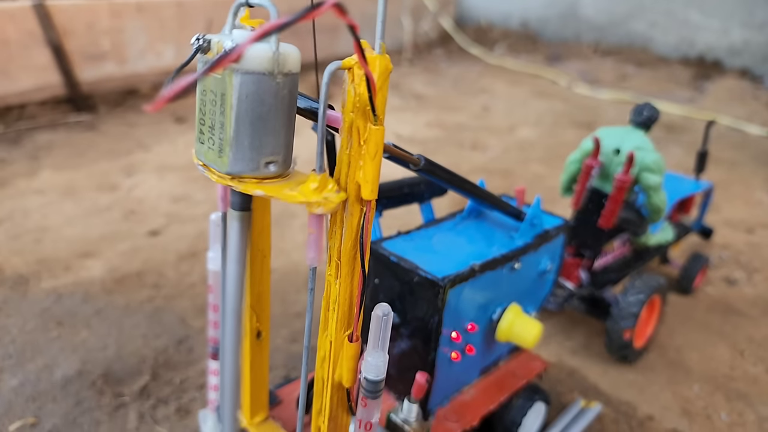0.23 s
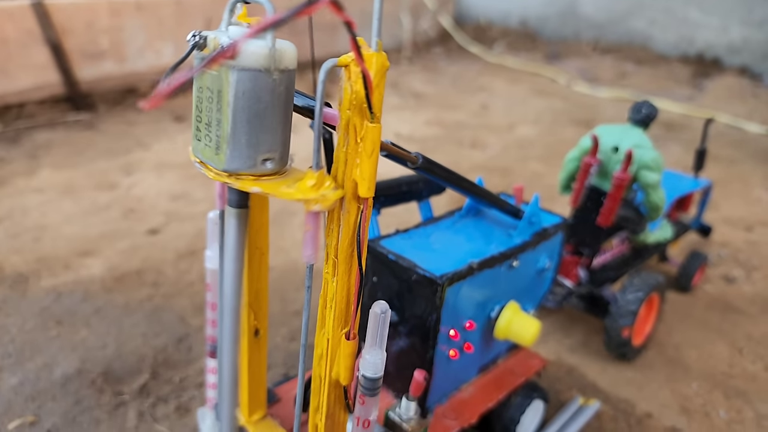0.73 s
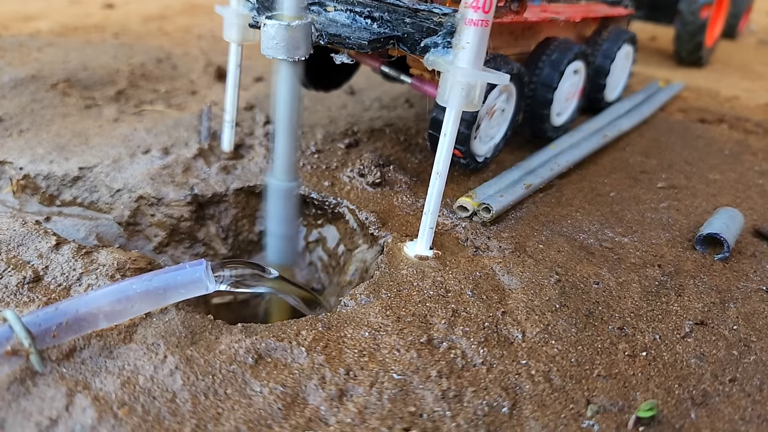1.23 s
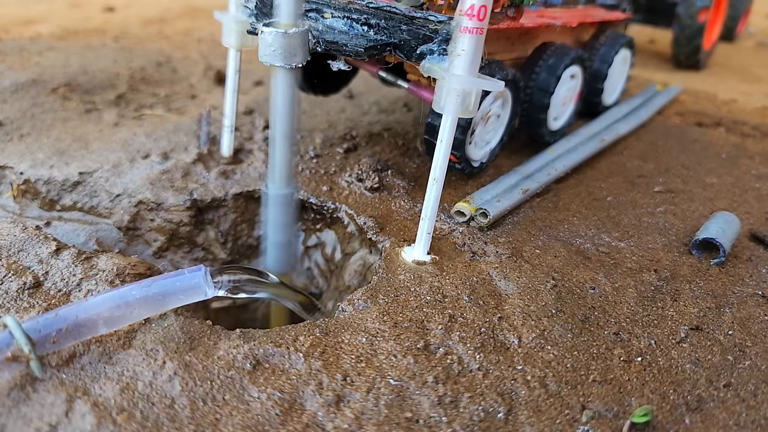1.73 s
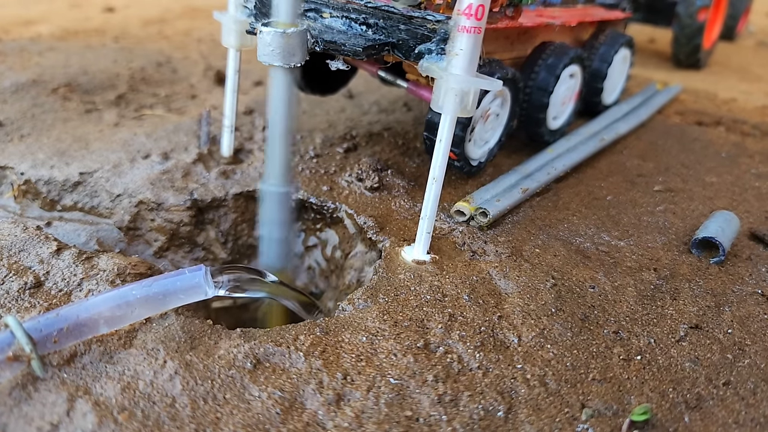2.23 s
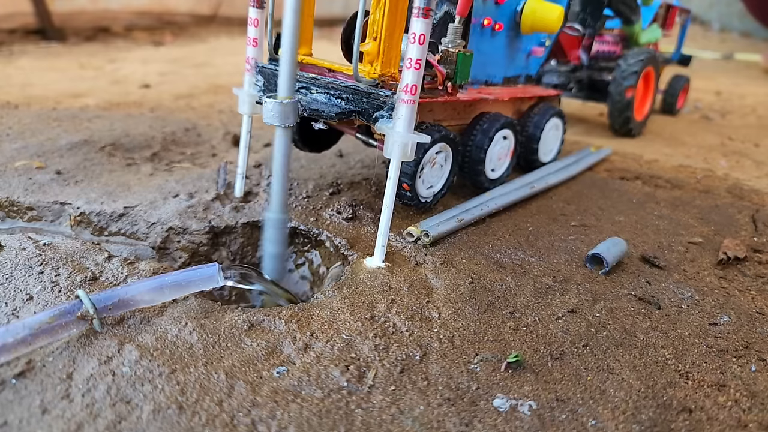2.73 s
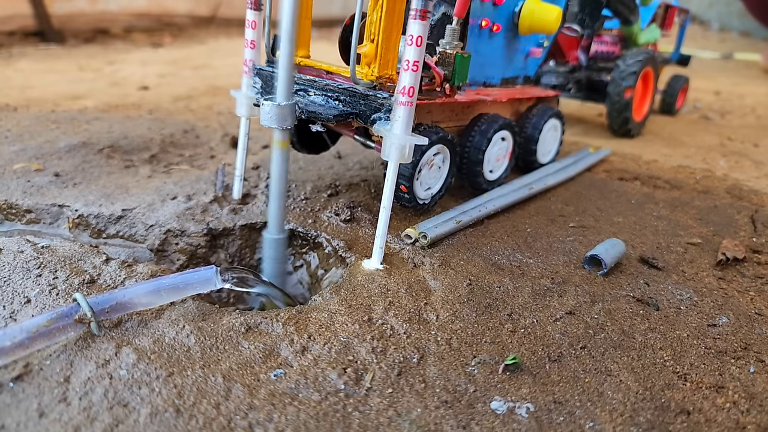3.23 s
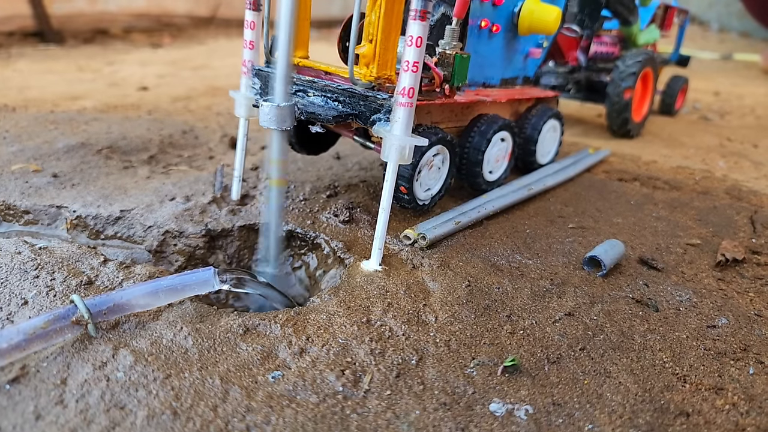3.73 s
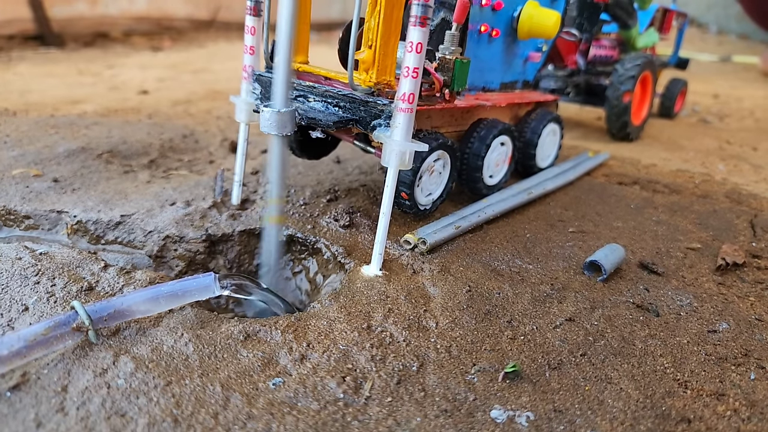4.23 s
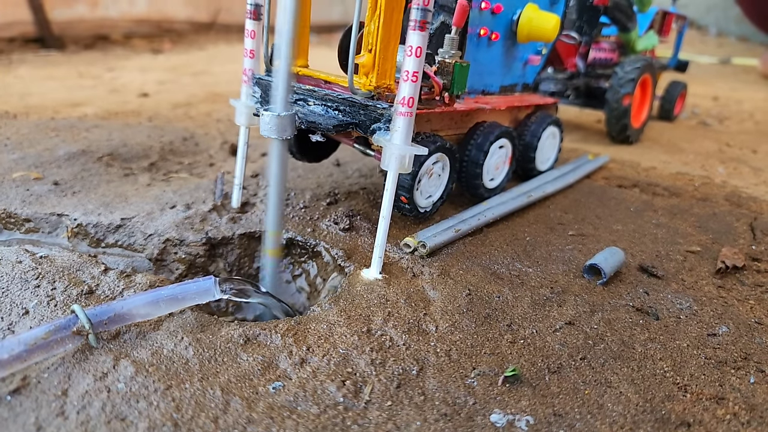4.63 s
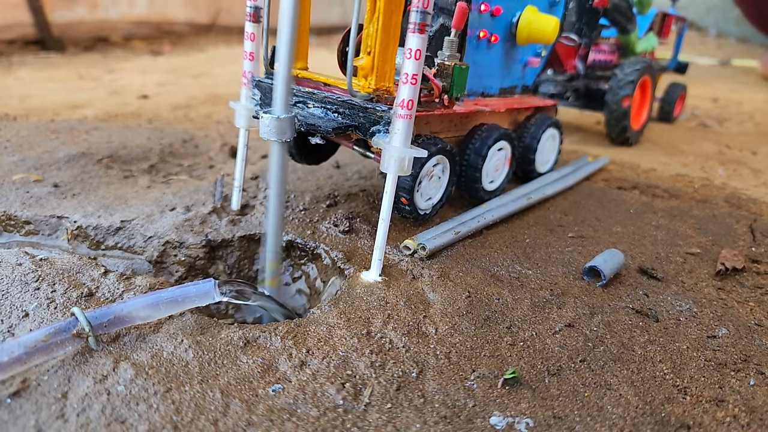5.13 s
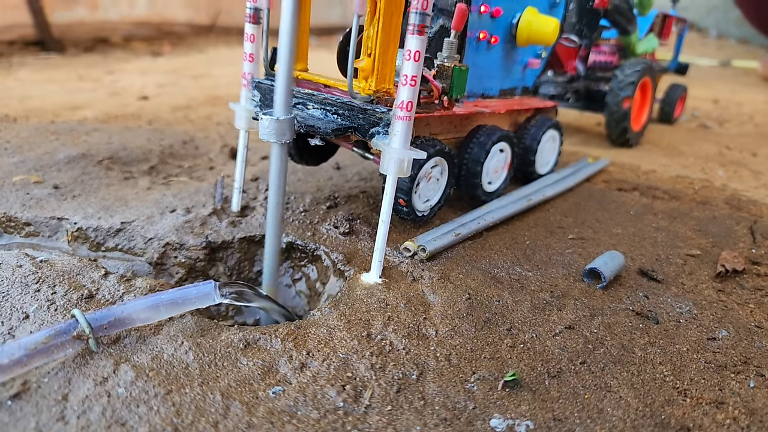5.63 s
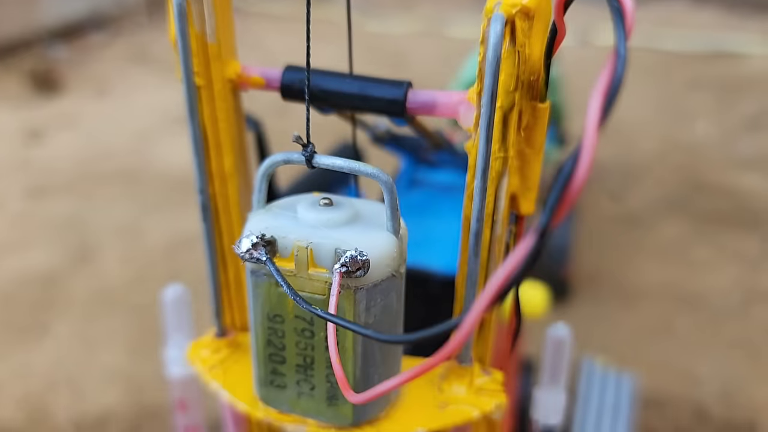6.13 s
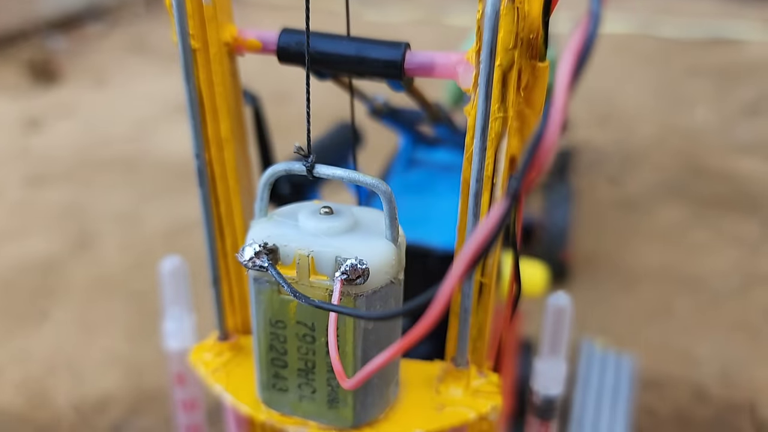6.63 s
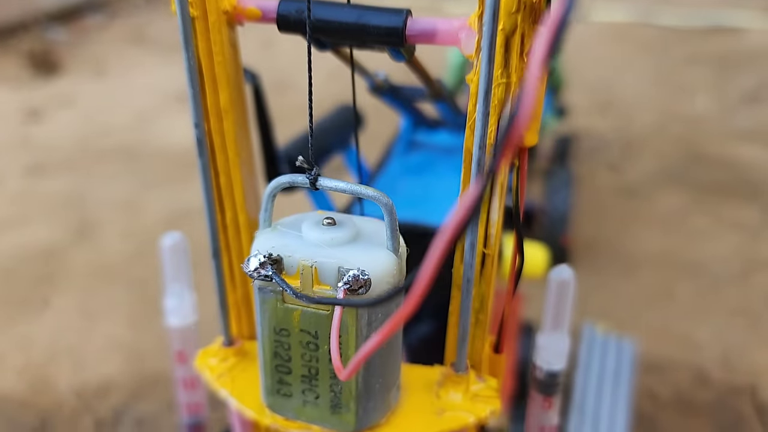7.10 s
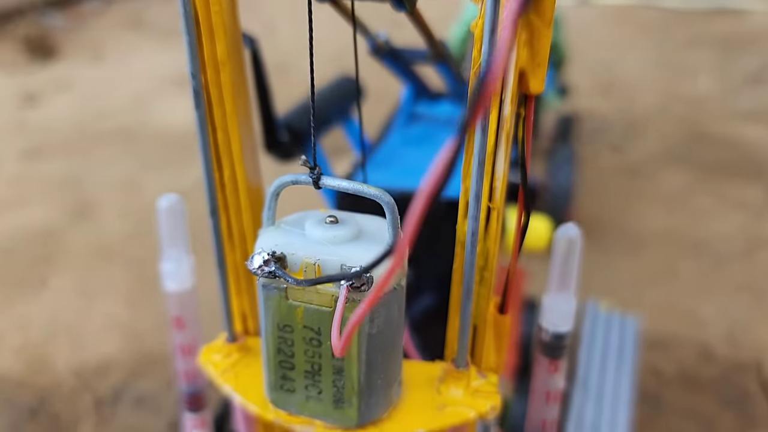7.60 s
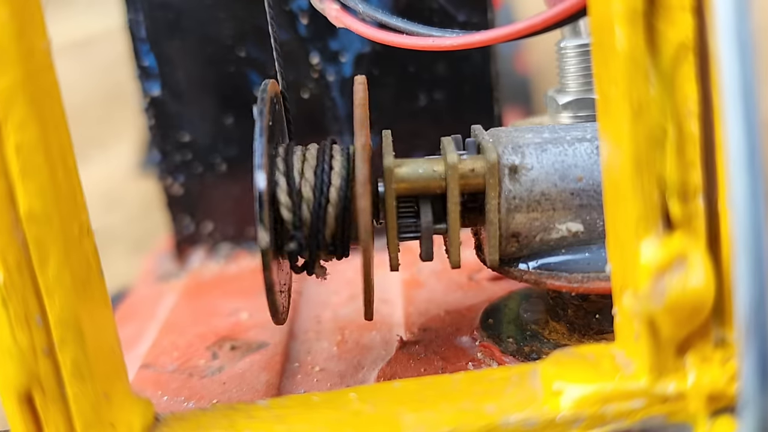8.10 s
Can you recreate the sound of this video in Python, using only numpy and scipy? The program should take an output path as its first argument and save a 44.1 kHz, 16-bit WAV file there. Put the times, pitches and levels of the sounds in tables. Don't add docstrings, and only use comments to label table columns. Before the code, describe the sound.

From 0 to about 5.8 seconds a small toy drill motor runs quietly and steadily, slightly left in a narrow, dry, close outdoor stereo image. It is a low buzzing hum with a soft throbbing rub, overlaid by very fast, dry rattling of loose parts and thin, bright brush ticks; harder little clicks jump out irregularly. At about 5.8 a geared winch motor switches on, close, centred and far louder. A clank and short metallic ring come first, then a rough, rising whirr with knocks around 5.9, a sharp crack as the string snaps tight, and another knock near 6.1, while the frame shudders low. Pulsing bites fade by about 6.4 as the speed settles. From there to 8.4 a steady, midrange nasal gear whine with bright overtones and gritty grinding wavers slightly, growing stronger after 7, with the drill rattle continuing underneath.

```python
import sys
import numpy as np
from scipy import signal
from scipy.fft import rfft, irfft, next_fast_len
from scipy.io import wavfile
from scipy.ndimage import uniform_filter1d

SR = 44100
rng = np.random.default_rng(int(sys.argv[2]) if len(sys.argv) > 2 else 0)


def wrap_up_sound(samples):
    columns = np.atleast_2d(samples).T
    tamed = np.clip(columns, -1, 1)
    steps = np.round(tamed * 32767).astype(np.int16)
    wavfile.write(sys.argv[1], SR, steps)


def decibels_to_gain(level_db):
    exponent = np.asarray(level_db, float) / 20
    return 10 ** exponent


N = 368676
TIME = np.arange(N) / SR


def evened(x):
    return x / np.sqrt(np.mean(x ** 2) + 1e-20)


def at_time(points):
    return np.interp(TIME, *np.transpose(points))


def read(points, size):
    hz, value = np.transpose(points)
    return np.interp(np.log(np.fft.rfftfreq(size, 1 / SR) + 1), np.log(hz + 1), value)


def colour(x, spectrum, size=8192):
    log_gain = np.log(decibels_to_gain(np.maximum(read(spectrum, size), -100)))
    whole = np.r_[log_gain, log_gain[-2:0:-1]]
    taps = np.fft.ifft(np.exp(np.conj(signal.hilbert(whole)))).real[:size // 2]
    taps = taps.reshape((1,) * (x.ndim - 1) + (-1,))
    return signal.oaconvolve(x, taps, axes=-1)[..., :N]


def wander(hz):
    at_s = np.arange(0, N + 64, 64) / SR
    b, a = signal.butter(2, hz * 128 / SR)
    noise = signal.lfilter(b, a, rng.standard_normal(len(at_s) + 2000))[2000:]
    return np.interp(TIME, at_s, evened(noise))


def strikes(at_s, size, decay_ms):
    at = np.clip((at_s * SR).astype(int), 0, N - 1)
    train = np.bincount(at, size * (at_s < N / SR), N)
    u = np.arange(1500) / SR / (decay_ms / 1000)
    return signal.oaconvolve(train, (1 - np.exp(-6 * u)) * np.exp(-u))[:N]


def grit(grain_db):
    grain = np.minimum(rng.exponential(1, N), 4)
    return decibels_to_gain(grain_db * grain) * rng.standard_normal((2, N))


SWITCH_S = 5.82
# missing_hz, time_constant_s
SPIN_UP = [
    (135, .05),
    (30, .13),
]
# start_s, mesh_hz
MESH_SPEED = [(5.8, 563.5), (6.45, 564.8), (6.8, 564.8), (6.95, 563.8), (7.3, 562.4), (7.5, 565.0),
              (7.8, 564.5), (8.0, 566.5), (8.36, 566.2)]
TEETH = 11
# start_s, level_db
LOAD = [(5.82, -34.5), (5.86, -26), (5.92, -21.5), (6.17, -17.5), (6.45, -19), (6.8, -21), (7.2, -15),
        (7.7, -13.5), (8.36, -14.5)]
# centre_s, extra_db
BITES = [(5.84, 7), (5.935, 8.5), (6.022, 10), (6.095, 6.5), (6.21, 3.5), (6.25, 1), (6.31, 5.5),
         (6.39, 4.5)]
# pinion_multiple, level_db, drift_db_per_s, swing_db, period_s, loudest_s
SWELLS = [(21, -41.5, -3, 1.5, 1.4, 6.9), (22, -33.5, -3.6, 2.5, 1.4, 6.9), (27, -43, 0, 5, 1.15, 6.55),
          (33, -38, -1.5, 4, .98, 6.85), (44, -40.5, .5, 5.5, 1.27, 7.66), (99, -44, 1.2, 3, .65, 7.62),
          (121, -39.5, -4.2, 2.5, 2.8, 7.2), (132, -46.5, 2, 2.5, 1.8, 7.7)]
# mesh_multiple, rms_db
MESH = [(5, -44.5), (6, -46), (7, -52), (8, -48), (10, -47.5), (13, -50.5), (14, -50), (15, -53.5),
        (16, -63), (17, -58), (18, -63), (19, -61), (20, -58)]
# pinion_multiple, rms_db
SHAFT = [(10, -42), (12, -44), (13, -49), (23, -50), (24, -52), (26, -52), (29, -51), (54, -50)]


def mesh_whine(since_s):
    short_hz = sum(hz * np.exp(-since_s / constant_s) for hz, constant_s in SPIN_UP)
    unsteady = .0022 + .017 * np.exp(-abs(TIME - 5.85) / .08)
    mesh_hz = (at_time(MESH_SPEED) - short_hz) * (1.001 + unsteady * wander(35))
    teeth = np.cumsum(mesh_hz) / SR
    wheel = np.cos(2 * np.pi * (teeth - teeth[int(6.86 * SR)]) / 58)
    bite_db = sum(db * np.exp(-((TIME - s) / .019) ** 2) for s, db in BITES)
    lines = [(1, at_time(LOAD) + bite_db + 0.14 * wander(33))]
    for order, db, drift_db, swing_db, period_s, loudest_s in SWELLS:
        k = round(order) / TEETH
        swing = swing_db * np.cos(2 * np.pi * (TIME - loudest_s) / period_s)
        swell_db = db + swing + drift_db * (TIME - 7.05)
        run_in_db = np.minimum(.022 * (k + 3) * short_hz, 18)
        line_db = swell_db - run_in_db + 7 / k * wheel + .4 * bite_db + 1.9 * wander(18)
        lines.append((k, line_db))
    lines += [(k, db + (2 + k / 10) * wander(k)) for k, db in MESH]
    lines += [(order / TEETH, db + 2.6 * wander(5)) for order, db in SHAFT]
    on = int(5.79 * SR)
    whine = np.zeros(N)
    for k, db in lines:
        whine[on:] += decibels_to_gain(db[on:]) * np.sin(2 * np.pi * (k * teeth[on:] + rng.random()))
    return np.sqrt(2) * whine


# freq_hz, density_db_per_hz
GEARBOX = [(300, -12), (480, -2), (570, 12.5), (640, -5.5), (760, -9.5), (900, -9.5), (1100, -6.5),
           (1700, -7.5), (2100, -6.5), (2700, -2.5), (3400, -7), (4300, -11.5), (5500, -13.5),
           (7200, -17.5), (8500, -21), (10500, -30), (12500, -32.5)]
# freq_hz, density_db_per_hz
MAST = [(30, -36), (60, -30), (92, 6), (115, 5), (150, 5), (250, 4), (400, 14), (520, -51.5)]


def gear_noise(since_s):
    grind_db = -29.5 + 0.5 * np.exp(-since_s / .2) - 0.83 * since_s
    jolt_s = TIME - 5.93
    shake_db = -35 + 20 * np.exp(np.where(jolt_s < 0, jolt_s / 0.14, -jolt_s / .17))
    a, b = grit(1.0)
    grind = decibels_to_gain(grind_db + 2) * evened(colour(a * decibels_to_gain(0.7 * wander(40)), GEARBOX))
    shake = decibels_to_gain(shake_db - 8.5) * evened(colour(b * decibels_to_gain(1.6 * wander(6.6)), MAST))
    return grind + shake


def winch():
    since_s = np.maximum(TIME - SWITCH_S, 0)
    switched = np.clip((TIME - 5.795) / 0.0059, 0, 1)
    return (mesh_whine(since_s) + gear_noise(since_s)) * switched


# start_s, peak_db, decay_ms
BLOWS = [(5.8, -16, 7), (5.811, -14, 5.7), (5.898, -8.5, 13), (5.909, -13, 6.2), (5.924, -13, 18),
         (5.937, -6, 10.3), (5.947, -13, 16), (5.963, -11.5, 13), (5.981, -15, 23), (6.087, -7.5, 14),
         (6.1, -17, 14), (6.133, -14.5, 16), (6.279, -16, 7)]
# freq_hz, density_db_per_hz
CLANK = [(60, -82), (300, -28), (900, 2), (1300, 2.5), (1700, -1.5), (2800, -0.5), (4000, -7), (6000, -23),
         (9000, -45), (12000, -49)]
# start_s, pitch_hz,
# peak_db, rise_ms, t60_s
RINGS = [(5.797, 618, -7.5, 3.8, 0.095), (5.815, 643, -13, 3.8, 0.14), (5.801, 350, -24, 4.6, .2),
         (5.821, 250, -28, 10, 0.33), (6.101, 180, -33, 8, 0.27), (6.1, 280, -29.5, 6, 0.24),
         (5.832, 403, -15.5, 5, 0.16), (5.899, 178, -17.5, 4.2, 0.27), (5.9, 620, -8.5, 9.3, 0.18),
         (5.902, 283, -22, 4.3, 0.35), (5.898, 89, -36.5, 17, 2.4), (5.933, 440, -16.5, 2.2, 0.13),
         (5.948, 220, -24.5, 3.1, 0.29), (6.089, 465, -14.5, 3.9, 0.094), (6.621, 279, -34, 15, 0.42),
         (6.681, 73, -38, 11, .3), (6.84, 133.6, -29.5, 25, 0.51), (8.12, 1237, -34, 40, 10),
         (5.8, 4100, -23, 2, 0.077)]


def clatter():
    rattle = np.zeros(N)
    for start_s, peak_db, decay_ms in BLOWS:
        rattle += strikes(np.array([start_s]), decibels_to_gain([peak_db]), decay_ms)
    crack = strikes(np.array([5.9385]), decibels_to_gain([11]), .1)
    out = colour(rattle * grit(1.44)[0] + crack, CLANK) * decibels_to_gain(1)
    for start_s, hz, db, rise_ms, t60_s in RINGS:
        start = round(start_s * SR)
        t = TIME[:N - start]
        envelope = decibels_to_gain(db - 60 * t / t60_s) * (1 - np.exp(-1000 * t / rise_ms))
        out[start:] += envelope * np.sin(2 * np.pi * hz * t)
    return out


# place_turns, decay_ms, casing_db, brush_db, scatter_db, timing_scatter_ms
KNOCKS = [
    (.87, 1.4, 0, -11, 2.2, .35),
    (.955, .8, -1.5, -15, 2.8, .3),
    (.075, 1.1, -2.5, -20, 3.2, .3),
    (.475, 1.4, -5.5, -8, 3.3, .4),
    (.44, .45, -14, 1.5, 4, .3),
    (.66, 1.4, -20, 0, 3.4, .4),
]
# start_s, peak_db
HARD = [(0.033, -15), (0.0866, -20), (0.337, -25), (0.3726, -12), (0.4955, -16), (0.569, -16),
        (0.8050, -14), (0.9474, -14), (1.219, -24), (1.3423, -20), (1.5941, -20), (2.044, -13.5),
        (2.649, -13), (2.811, -14), (3.2554, -19), (3.7538, -16), (3.9523, -13.5), (4.096, -16),
        (4.4528, -16), (4.488, -16), (4.8804, -25), (5.042, -18), (5.2053, -14), (5.261, -19),
        (5.4003, -17), (5.438, -16), (5.546, -18)]
# freq_hz, density_db_per_hz
CASING = [(410, -28), (700, -24.5), (828, -17), (970, -5), (1270, -4), (1450, 3), (1760, 0.5), (1900, 4),
          (2180, -10), (2420, 3), (2700, 5.5), (2970, -4.5), (3260, -3), (3650, -10), (6500, -22.5),
          (8450, -62), (14300, -120)]
# freq_hz, density_db_per_hz
BRUSH = [(3240, 14.5), (5500, 3.5), (7630, 1.5), (8770, 5.5), (10100, 1), (12100, 5.5), (14700, 5.5),
         (15600, -3)]


def loose_parts(turns):
    casing, brush = .17 + np.zeros(N), .16 + np.zeros(N)
    snap = np.zeros(N)
    count = np.arange(int(turns[-1]) + 2)
    shared = rng.standard_normal(len(count))
    for place, decay_ms, casing_db, brush_db, scatter_db, late_ms in KNOCKS:
        late, rough = rng.standard_normal((2, len(count)))
        at_s = np.interp(count + place - 1, turns, TIME, left=N, right=N) + late_ms / 1000 * late
        size = decibels_to_gain(scatter_db * np.minimum(rough + 0.3 * shared, 1.2))
        blow = strikes(at_s, size, decay_ms)
        snap += decibels_to_gain(casing_db) * strikes(at_s, size, 0.095)
        casing += decibels_to_gain(casing_db) * blow
        brush += decibels_to_gain(brush_db) * blow
    hard_s, hard_db = np.transpose(HARD)
    casing += strikes(hard_s, decibels_to_gain(hard_db + 15), 2)
    snap += strikes(hard_s, decibels_to_gain(hard_db + 26.5), 0.044)
    knocking = casing * grit(0.6) + decibels_to_gain(4) * snap
    ticking = brush * decibels_to_gain(1.9 * wander(45)) * grit(2)
    rattle = decibels_to_gain(-30) * evened(colour(knocking, [(150, -97)] + CASING))
    ticks = decibels_to_gain(-39.5) * evened(colour(ticking, [(900, -90)] + BRUSH))
    return rattle + ticks


# shaft_multiple, level_db
HUM = [(1, -23), (2, -17), (3, 0), (4, -4), (5, -10), (6, -15), (7, -1), (8, -7.5), (9, -6.5), (10, -7.5),
       (11, -10.5), (12, -13), (13, -14), (14, -17), (15, -22), (16, -11), (17, -5), (18, -7), (19, -7)]


def motor_hum(turns):
    hum = np.zeros(N)
    for k, db in HUM:
        hum += decibels_to_gain(db + 0.6 * wander(10.5)) * np.sin(2 * np.pi * (k * turns + rng.random()))
    return decibels_to_gain(-46) * evened(hum)


# freq_hz, density_db_per_hz
RUMBLE = [(25, -41), (38, -36), (47, -10), (60, -6.5), (130, -18), (250, -7), (420, -2), (520, 2.5),
          (720, -8), (900, -19)]


def rumble(turns):
    throb = 1 + 1.3 * np.cos(2 * np.pi * (turns - .03))
    return decibels_to_gain(-46.5) * evened(colour(throb * grit(0.52), RUMBLE))


# freq_hz, likeness_0_to_1
SAME = [(80, 0.74), (700, 0.84), (1450, 0.87), (2150, 0.82), (2800, 0.68), (4200, 0.58), (5600, 0),
        (7000, 0), (10000, 0.14), (15000, 0.1)]
# freq_hz, tilt_db
TILT = [(60, 0), (180, 3), (550, 3), (1650, 0.5), (4970, -0.5), (15000, 3)]


def at_ports(pair):
    size = next_fast_len(N)
    a, b = rfft(pair, size)
    same = np.clip(read(SAME, size), 0, 1)
    tilt = decibels_to_gain(read(TILT, size) / 2)
    late = np.exp(-2j * np.pi * np.fft.rfftfreq(size) * 6)
    right = same * a * late + np.sqrt(1 - same ** 2) * b
    return irfft([a * tilt, right / tilt], size)[:, :N]


# start_s, turns_per_s
SPIN = [(0.0, 55.4), (0.4, 55.76), (1.2, 55.54), (1.6, 55.59), (2.0, 56.14), (2.4, 55.96), (2.8, 56.13),
        (3.6, 55.97), (4.8, 55.83), (5.2, 55.9), (5.6, 55.66), (6.0, 55.87), (7.2, 55.67), (8.36, 55.67)]


def drill():
    turns = .21 + np.cumsum(at_time(SPIN)) / SR
    return at_ports(loose_parts(turns) + rumble(turns) + motor_hum(turns))


def scene():
    return winch() + clatter() + drill()


# freq_hz, side_over_mid_db
SIDE_KEPT = [(100, -30), (800, -26), (1200, -20), (5300, -20), (5900, -7), (8000, -7), (8600, -6),
             (11000, -6), (12000, -20)]


def narrowed(x):
    mid, side = signal.stft([x[0] + x[1], x[0] - x[1]], nperseg=2048, noverlap=1024)[2]
    starts = np.arange(0, 1025, 16)
    band = np.arange(1025) // 16

    def power(z):
        return uniform_filter1d(np.add.reduceat(abs(z) ** 2, starts)[band], size=2, axis=1)

    side = side * (power(side) > power(mid) * decibels_to_gain(2 * read(SIDE_KEPT, 2048))[:, None])
    return signal.istft([mid + side, mid - side], nperseg=2048, noverlap=1024)[1][:, :N] / 2


def roll_off(x):
    return signal.sosfilt(signal.butter(12, 15760, fs=SR, output="sos"), x)


def record(dry):
    taps = signal.firwin(511, 15750, window=("kaiser", 9), fs=SR)
    limited = signal.oaconvolve(np.tanh(dry / 2) * 2, taps[None], "same")
    return roll_off(narrowed(limited))


dry = scene()
out = record(dry)
wrap_up_sound(out)
```